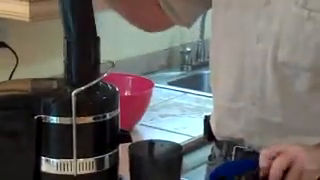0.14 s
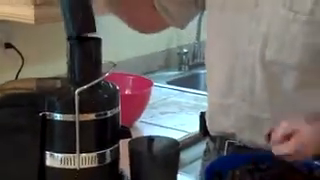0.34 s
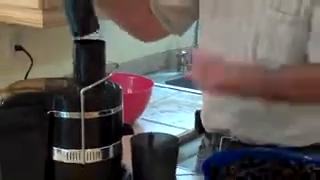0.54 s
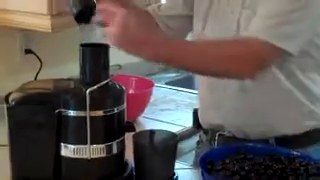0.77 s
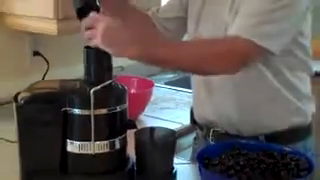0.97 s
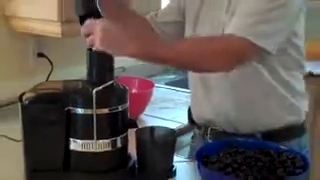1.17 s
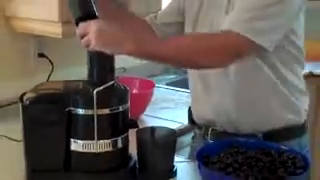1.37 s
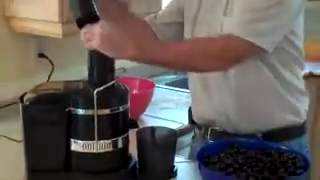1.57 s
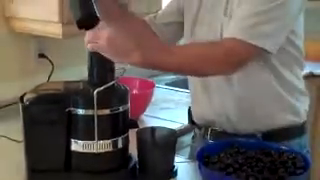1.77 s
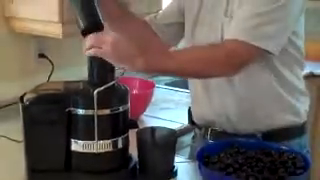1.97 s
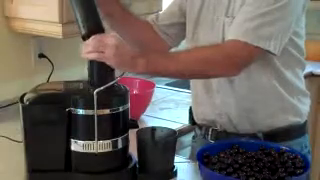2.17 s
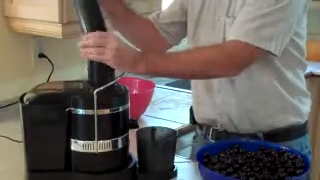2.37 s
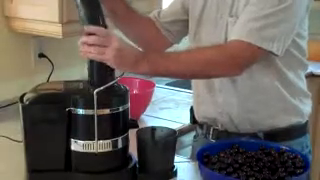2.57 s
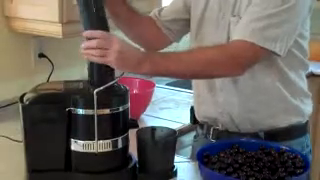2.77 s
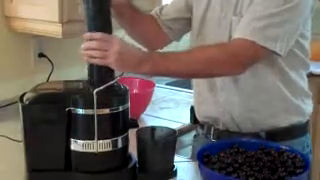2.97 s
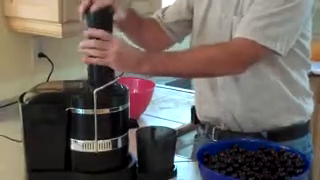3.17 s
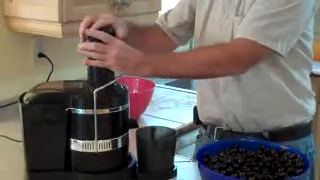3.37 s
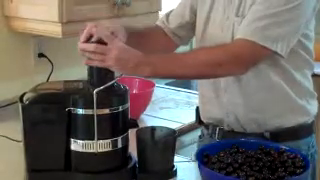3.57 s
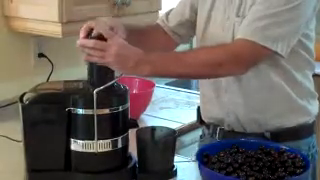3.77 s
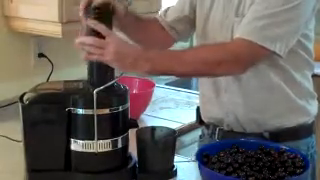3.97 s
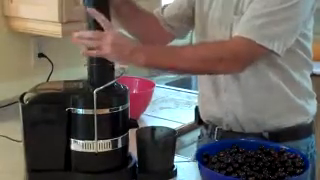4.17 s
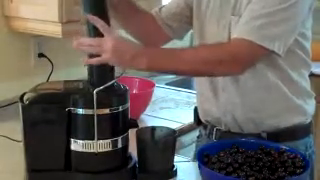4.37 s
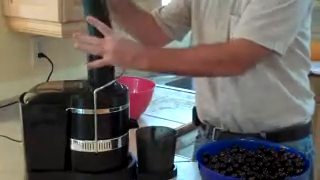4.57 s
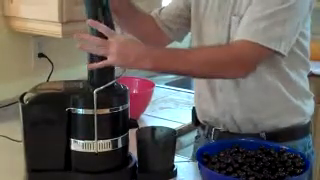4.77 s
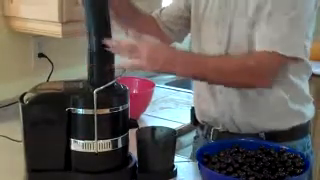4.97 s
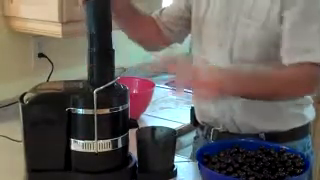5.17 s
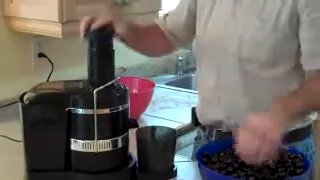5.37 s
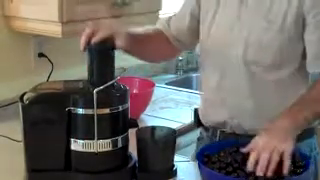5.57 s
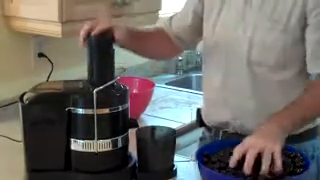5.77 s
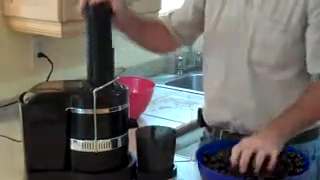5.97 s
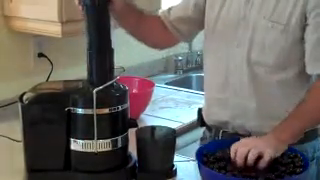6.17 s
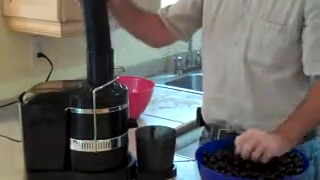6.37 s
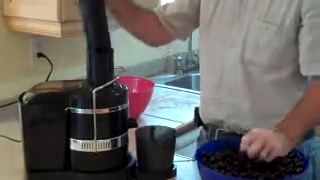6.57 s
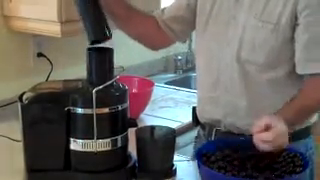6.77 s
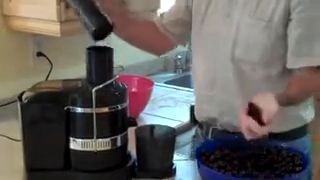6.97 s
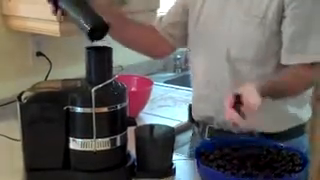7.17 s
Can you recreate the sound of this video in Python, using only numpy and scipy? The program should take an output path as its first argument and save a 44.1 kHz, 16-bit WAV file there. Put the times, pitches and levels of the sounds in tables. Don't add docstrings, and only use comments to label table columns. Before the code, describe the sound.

A countertop juicer runs throughout in a hard-walled kitchen: steady low mains hum, a thin mid-pitched whine and breathy rushing air, wavering slightly as hands move around the chute. Only the motor is heard until about 1.5 seconds, when a handful of small fruit falls in. From 1.5 to 2.8 seconds sharp, irregular cracks crowd together with wet, gritty shredding and hollow plastic rattling, densest around 1.7 to 2.6. A few more clattering hits come near 3.05, then a bright snap at 3.5 with little residue. The motor continues, subtly muffled at times. One stray piece cracks and rattles at 4.75 to 5.0. At 5.45 the pusher lands with a loud, short, hollow plastic knock. Motor alone follows, with a very faint rim brush at 6.4, continuing to the end past 7 seconds. Close small stereo microphone, short room echo, clipped peaks.

```python
import sys
import numpy as np
from scipy import signal
from scipy.fft import rfft, irfft, next_fast_len
from scipy.io import wavfile
from scipy.ndimage import uniform_filter1d, map_coordinates

SR = 44100
rng = np.random.default_rng(int(sys.argv[2]) if len(sys.argv) > 2 else 0)


def field_ratio(decibels):
    return 10 ** (np.asarray(decibels, dtype=float) / 20)


def digitize_waveform(pressure):
    field = np.atleast_2d(pressure).T
    bounded = np.clip(field, -1, 1)
    quanta = np.round(bounded * 32767).astype(np.int16)
    wavfile.write(sys.argv[1], SR, quanta)


N = 318843

BANDS_HZ = 30 * 2 ** np.arange(0, 10)
# pitch in Hz, width in Hz, level in dB.
HOUSING_MODES = [(600.3, 88, 5), (804, 51, -4.5), (992, 51.6, 5), (1273, 25, -11.5), (1480, 83, 0),
                 (1930, 57, -43), (2460, 52, 2.5), (3000, 53, -5), (3578, 105, -3), (4130, 137, -13.5),
                 (1926, 2224, -4), (780, 420, -6.5)]


def on_log(table, hz):
    rows = np.array(table, float)
    return np.interp(np.log(np.maximum(hz, 1)), np.log(rows[:, 0]), rows[:, 1])


def shaped(x, gain):
    n = 2 * next_fast_len(x.shape[-1] // 2 + SR // 40, real=True)
    spectrum = rfft(x, n) * gain(np.fft.rfftfreq(n, 1 / SR))
    return irfft(spectrum, n)[..., :x.shape[-1]]


def unit(x):
    return x / np.sqrt(np.mean(x ** 2))


def causal(gain):
    cepstrum = irfft(np.log(gain + 1e-9))
    cepstrum[1:len(gain) - 1] *= 2
    cepstrum[len(gain):] = 0
    return np.exp(rfft(cepstrum))


def modes(table, hz, scatter_db=0):
    f, width, db = np.array(table, float).T[:, :, None]
    damping = (hz * width) ** 2
    resonance = damping / ((f * f - hz * hz) ** 2 + damping)
    power = np.sum(field_ratio(2 * (db + scatter_db)) * resonance, axis=0)
    return causal(np.sqrt(power / np.mean(power)))


def walk(rate, n=N):
    knots = rng.standard_normal(int(n / SR * rate) + 4)
    coarse = map_coordinates(knots, [np.arange(0, n + 256, 256) * rate / SR], order=3)
    return np.interp(np.arange(n), np.arange(len(coarse)) * 256, coarse)


def pair(mid_side, hz, nearness=1):
    # pitch in Hz, left-right correlation.
    likeness = [(40, 0.47), (130, 0.99), (300, 0.967), (600, 0.8995), (1200, 0.694), (2600, 0.391),
                (5500, 0.376), (12000, 0.29)]
    like = np.clip(on_log(likeness, hz), 0, 1) ** nearness
    common = np.sqrt((1 + like) / 2) * mid_side[0]
    differing = np.sqrt((1 - like) / 2) * mid_side[1]
    return common + np.array([[1], [-1]]) * differing


def diffuse(n):
    hz = np.fft.rfftfreq(n, 1 / SR)
    both = pair(rfft(rng.standard_normal((2, n))), hz)
    place = np.log2(np.maximum(hz, 1) / BANDS_HZ[0])
    return hz, [both * np.clip(1 - abs(place - k), 0, 1) for k in range(len(BANDS_HZ))]


def tone(hz, db, drift):
    t = np.arange(N) / SR
    return np.sqrt(2) * field_ratio(db) * np.sin(2 * np.pi * (hz * t + rng.random()) + drift)


def mains_hum(chute_db, drift):
    orders = [1, 2, 3, 4, 5, 6, 8, 10, 14, 16]
    orders_db = [-18.5, -12.5, -2.5, 3, -7.5, -4, -13.5, -3, -6.5, -8]
    low_db = -53.5 + 0.188 * chute_db
    upper_db = -55.5 + chute_db
    hum = 0
    for order, order_db in zip(orders, orders_db):
        base_db = low_db if order < 5 else upper_db
        hum = hum + tone(59.96 * order, base_db + order_db + 2.66 * walk(15), drift)
    return hum


def rotor_whine(whine_db, drift):
    lines_hz = [896.7, 657.0, 776.4, 1013.5, 1259.0, 1792.4, 2744.5, 3939.0]
    lines_db = [0, -15, -17, -12, -22, -13.5, -12, -20.5]
    whine = tone(lines_hz[0], whine_db + walk(9.6), drift)
    for hz, db in zip(lines_hz[1:], lines_db[1:]):
        whine = whine + tone(hz, 0.357 * whine_db - 28.5 + db + 1.65 * walk(3.3), drift)
    return whine


def air_rush(chute_db):
    # pitch in Hz, level in dB per Hz.
    air_colour = [(30, -8.5), (70, -6), (140, -5.5), (250, 7), (480, -1.5), (650, 0.5), (1000, 0.5),
                  (2000, 0), (3500, -3.5), (4800, -5), (6000, -1), (8000, 2), (10000, -1.5), (11300, 0),
                  (12400, -13.5)]
    n = next_fast_len(N, real=True)
    hz, bands = diffuse(n)
    colour = field_ratio(on_log(air_colour, hz))
    air = 0
    for band_hz, band in zip(BANDS_HZ, bands):
        near_chute = np.exp(-np.log(band_hz / 600) ** 2 / 0.206)
        flutter_db = walk(11) * min(1., (400 / band_hz) ** 0.101)
        level_db = flutter_db + 0.1 * chute_db * near_chute
        air = air + field_ratio(level_db) * irfft(band * colour, n)[:, :N]
    return field_ratio(-33) * air


def motor():
    # time in seconds, whine in dB, hum let out by the chute in dB.
    motor_levels = [(0, -43.5, 4.5), (.35, -44, 2), (.95, -44, 2), (1.13, -50.5, -2), (1.3, -45, 7),
                    (2, -47.5, -16.5), (3, -43, 3), (3.28, -50.5, -24.5), (3.42, -47.5, -23),
                    (3.9, -45.5, -3), (4.2, -44, 3), (4.5, -43, 1.5), (4.8, -44.5, 6.5), (5.8, -44.5, -1),
                    (6.2, -42, -20.5), (6.36, -53, -7.5), (6.5, -44.5, 3), (7.23, -44.5, 7.5)]
    t = np.arange(N) / SR
    s, *columns = np.transpose(motor_levels)
    whine_db, chute_db = (np.interp(t, s, column) for column in columns)
    drift = 0.22 * walk(3.95)
    return mains_hum(chute_db, drift) + rotor_whine(whine_db, drift) + air_rush(chute_db)


def grit(n, spread_db):
    size_db = spread_db * np.minimum(rng.exponential(size=n), 6)
    return unit(rng.standard_normal((2, n)) * field_ratio(size_db))


def add(out, s, rise_ms, fade_ms, paths):
    t = np.arange(SR // 12) / SR
    swell = (1 - np.exp(-1000 * t / max(rise_ms, .1))) * np.exp(-1000 * t / max(fade_ms, 1))
    start = int(s * SR)
    strikes = grit(len(t), spread_db=2.5) * swell / swell.max()
    out[:, start:start + len(t)] += shaped(strikes, paths)


def crack(hz):
    # pitch in Hz, level in dB.
    crack_colour = [(400, -20.5), (1500, -11), (3000, -4), (5000, -1.5), (8000, -1), (10000, -2.5),
                    (12500, -3)]
    return causal(field_ratio(on_log(crack_colour, hz) - 9.5))


def chute(hz):
    # pitch in Hz, width in Hz, level in dB.
    chute_modes = [(184, 11.4, -2), (256, 35, 1), (287, 31.7, -8), (382.1, 28.4, -6)]
    return modes(chute_modes, hz)


def grapes():
    # time in seconds,
    # crack in dB, housing ring in dB, pitch of the struck part in Hz.
    grape_hits = [(1.5238, -7.5, -26, 924), (1.5878, -13, -26, 857), (1.6442, -6.5, -26.5, 604),
                  (1.71, 0.5, -20, 1510), (1.7216, -6, -25, 1020), (1.7819, -7, -17.5, 1070),
                  (1.7873, 1.5, -16.5, 2370), (1.8021, -1, -24.5, 955), (1.9125, -12, -27, 1490),
                  (2.0055, 0.5, -32.5, 2084), (2.0165, 0, -19, 2460), (2.1139, -6, -26, 1460),
                  (2.1411, -4.5, -31.5, 606), (2.211, -2.5, -27, 2170), (2.2242, -6.5, -27, 990),
                  (2.3344, -12, -24, 980), (2.361, -2.5, -23.5, 963), (2.372, 2, -26.5, 2160),
                  (2.422, 3.5, -24, 988), (2.4761, -5, -22, 2470), (2.5716, 1, -22, 1480),
                  (2.5992, -5.5, -24, 603), (2.6593, -5, -21, 1027), (2.7296, -23, -24, 615),
                  (2.8209, -15, -29.5, 970),
                  (3.0417, -2, -16.5, 1480), (3.0699, -9.5, -17, 2150), (3.0849, -6, -14, 899),
                  (3.4772, -7, -33.5, 830), (3.49, 6, -32, 2510), (3.5, -22.5, -36.5, 2500),
                  (4.7566, 1, -12.5, 1480), (4.8008, -24, -28, 1480), (4.8626, -19.5, -23.5, 1480),
                  (4.9397, -7.5, -24, 1930), (4.9758, -17.5, -27, 1930)]
    out = np.zeros((2, N))
    for s, crack_db, ring_db, struck_hz in grape_hits:
        fade_ms = 9.55 - 0.7259 * crack_db
        distance = np.log(np.array(HOUSING_MODES)[:, 0] / struck_hz) / .12
        favour_db = 10 * np.exp(-distance ** 2) + rng.standard_normal(len(HOUSING_MODES))

        def paths(hz):
            ring = modes(HOUSING_MODES, hz, favour_db[:, None])
            return field_ratio(crack_db - 1.5) * crack(hz) + field_ratio(ring_db - 1.5) * ring

        add(out, s, 1.067, fade_ms, paths)
    return out


def shredding():
    # start in seconds, length in seconds, hiss in dB, housing ring in dB, tumble in dB.
    smears = [(1.52, 0.0328, -31.5, -34.5, -29.5), (1.601, 0.168, -15.5, -23.5, -36.5),
              (1.751, 0.095, -16, -38, -29), (1.913, 0.181, -15.5, -28, -38),
              (2.105, 0.079, -17.5, -27, -32), (2.185, 0.0765, -18, -31, -39.5),
              (2.302, 0.08, -18.5, -28.5, -36.5), (2.358, 0.1117, -14, -27, -35),
              (2.451, 0.1135, -20.5, -30, -32.5), (2.603, 0.1106, -23, -27, -29),
              (2.73, 0.0453, -33.5, -30.5, -24.5), (2.788, 0.211, -28.5, -39.5, -53),
              (3.047, 0.034, -24, -20, -31.5), (3.076, 0.0335, -38.5, -26, -28.5),
              (3.157, 0.0814, -25, -45.5, -51), (3.51, 0.112, -29.5, -45.5, -51.5),
              (4.603, 0.16, -31.5, -49, -61.5), (4.746, 0.031, -13.5, -32.5, -39),
              (4.801, 0.14, -30, -32, -35.5), (4.843, 0.03, -40.5, -36, -22.5),
              (4.933, 0.0834, -34, -27.5, -30.5), (5.232, 0.186, -51.5, -48, -53.5)]
    attack_s, release_s = 0.0098, 0.0168
    t = np.arange(N) / SR
    power = np.full((3, N), 1e-12)
    for s, length_s, *levels_db in smears:
        span = slice(int(s * SR), int((s + .6) * SR))
        age = t[span] - s
        drag = np.clip(age / attack_s, 0, 1) * np.exp(-np.maximum(age - length_s, 0) / release_s)
        power[:, span] += (field_ratio(np.array(levels_db))[:, None] * drag) ** 2
    hiss, ring, tumble = np.sqrt(power)
    turning = field_ratio(0.633 * np.sin(2 * np.pi * 72.0 * t))
    strikes = grit(N, spread_db=2.0) * turning
    direct = shaped(strikes * hiss * field_ratio(2.5 + 3.02 * walk(46)), crack)
    shell = shaped(strikes * ring * field_ratio(-5.5 + 3.6 * walk(30.055)), lambda hz: modes(HOUSING_MODES, hz))
    loose = shaped(strikes * tumble * field_ratio(-1.5 + 1.03 * walk(20)), chute)
    return direct + shell + loose


def pusher():
    # pitch in Hz, width in Hz, level in dB.
    tube_modes = [(285, 123, 0.5), (466, 215, 1.5), (598, 93, 9.5), (723, 94, 5.5), (847, 29, 8),
                  (960, 64, -10.5), (1250, 110, -3.5), (1480, 95, 7.5), (2044, 217, 3), (2280, 290, -6.5),
                  (2720, 250, -1), (1300, 2060, -4.5)]
    # time in seconds, crack in dB, body in dB, rise in ms, fade in ms.
    knocks = [
        (5.4448, -4, 1.5, 0.217, 1.1),
        (5.449, -18.5, -11.5, 0.95, 11.7),
    ]
    # time in seconds, level in dB, rise in ms, fade in ms.
    brush = (6.435, -39.5, 2.5, 15)
    # pitch in Hz, width in Hz, level in dB.
    rim_modes = [(260, 53, -9), (619, 41, 9)]
    out = np.zeros((2, N))
    for s, crack_db, body_db, rise_ms, fade_ms in knocks:

        def paths(hz):
            body = modes(tube_modes, hz) + field_ratio(-17) * chute(hz)
            return field_ratio(crack_db) * crack(hz) + field_ratio(body_db) * body

        add(out, s, rise_ms, fade_ms, paths)
    s, brush_db, rise_ms, fade_ms = brush
    add(out, s, rise_ms, fade_ms, lambda hz: field_ratio(brush_db) * modes(rim_modes, hz))
    return out


def kitchen(mid_side):
    # pitch in Hz, seconds to fall by 60 dB.
    room_t60 = [(150, 0.56), (500, 0.646), (2000, 0.658), (5000, 0.516), (10000, 0.331)]
    n = next_fast_len(int(.8 * SR))
    t = np.arange(n) / SR
    bands = [irfft(band, n) for band in diffuse(n)[1]]

    def fade(t60):
        return field_ratio(-60 * t / t60) * np.sqrt(2 * np.log(1000) / t60 / SR)

    tail = sum(band * fade(on_log(room_t60, f)) for f, band in zip(BANDS_HZ, bands))
    cluster = sum(bands) * fade(0.0367)
    response = field_ratio(-0.5) * tail + field_ratio(-13) * cluster
    response[:, 0] = 0
    m = next_fast_len(N + n, real=True)
    hz = np.fft.rfftfreq(m, 1 / SR)
    spectra = rfft(mid_side, m) * (1j * hz / (120 + 1j * hz)) ** 3
    walls = rfft(response, m)
    power = np.mean(abs(1 + walls) ** 2, axis=0)
    evening = np.sqrt(uniform_filter1d(power, size=12000) / uniform_filter1d(power, size=300))
    spectra = spectra * causal(evening)
    direct = pair(spectra, hz, nearness=0.083)
    return irfft(direct + spectra[0] * walls, m)[:, :N]


def scene():
    return motor() + kitchen(grapes() + shredding() + pusher())


def band_limit(x):
    return signal.sosfilt(signal.butter(12, 12340, fs=SR, output="sos"), x)


def record(dry):
    # cavity pitch in Hz, width in Hz, mesh roll-off in Hz.
    ports = [(7484, 1347, 9280), (6421, 962, 6633)]

    def peak(hz, f, width):
        return f * f / (f * f - hz * hz + 1j * hz * width)

    def cavities(hz):
        return np.array([peak(hz, f, width) * peak(hz, mesh, 1.5985 * mesh) for f, width, mesh in ports])

    top_cut = signal.ellip(10, .3, 70, 12150, fs=SR, output="sos")
    heard = signal.sosfilt(top_cut, shaped(dry, cavities))
    return band_limit(np.clip(heard, -1, 1))


dry = scene()
out = record(dry)
digitize_waveform(out)
```